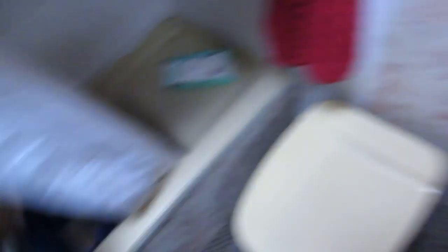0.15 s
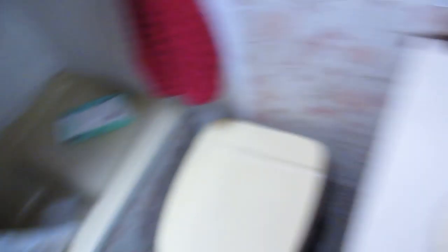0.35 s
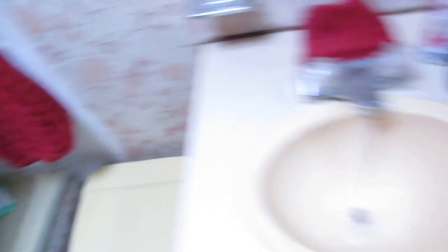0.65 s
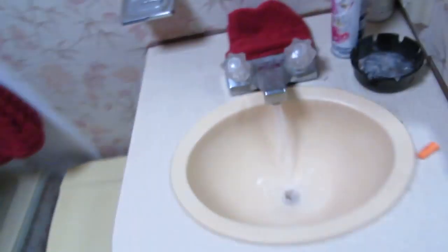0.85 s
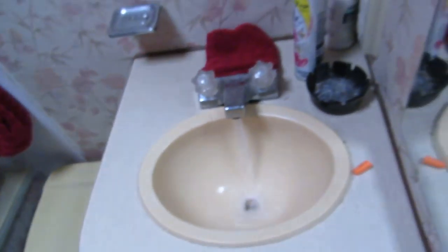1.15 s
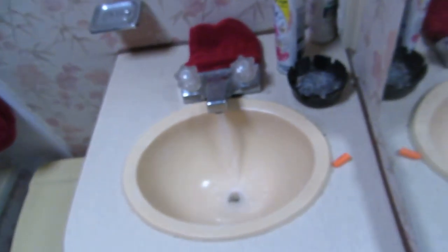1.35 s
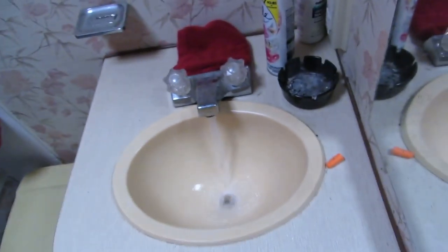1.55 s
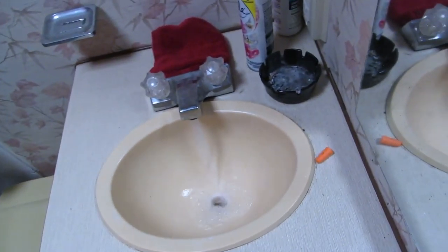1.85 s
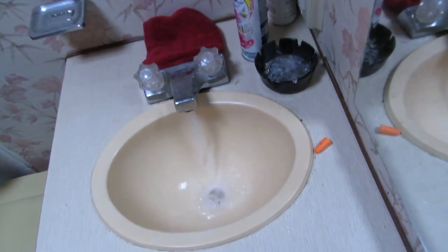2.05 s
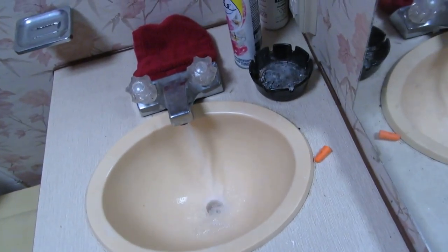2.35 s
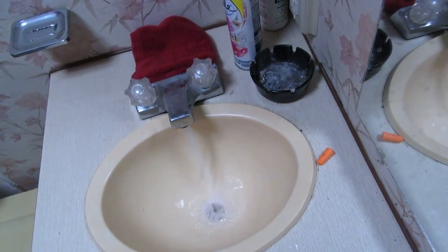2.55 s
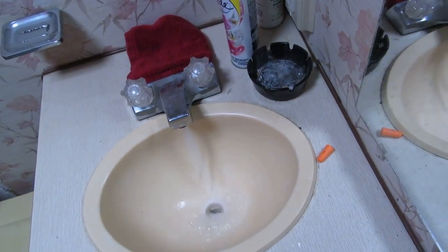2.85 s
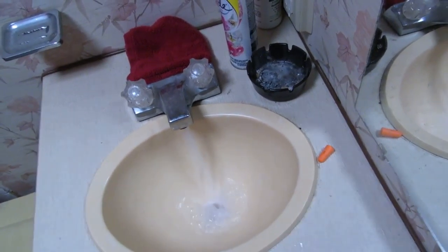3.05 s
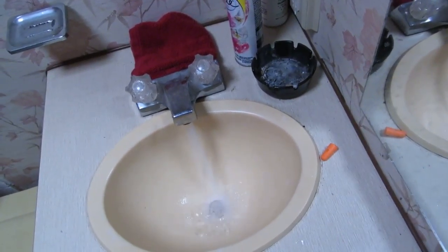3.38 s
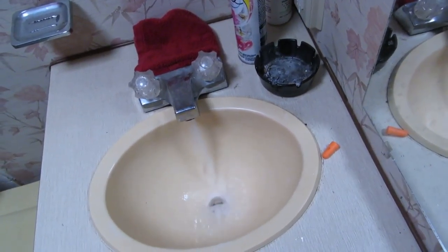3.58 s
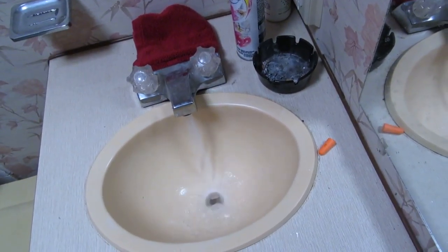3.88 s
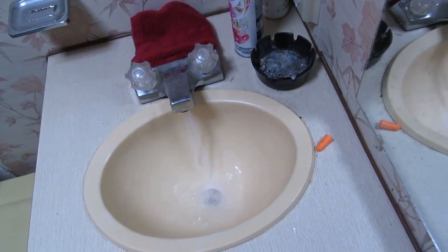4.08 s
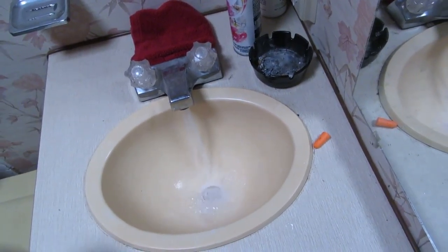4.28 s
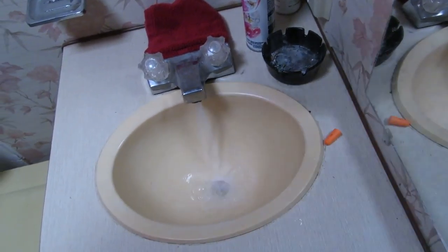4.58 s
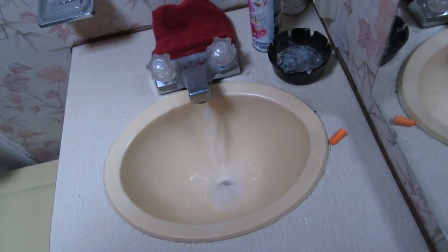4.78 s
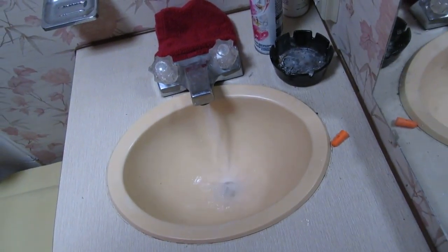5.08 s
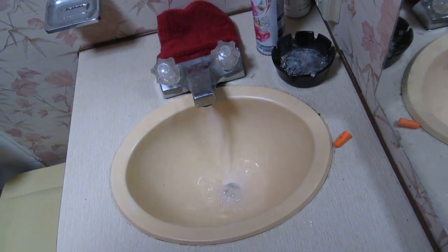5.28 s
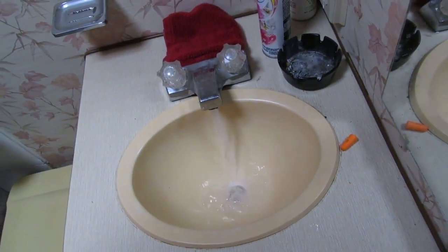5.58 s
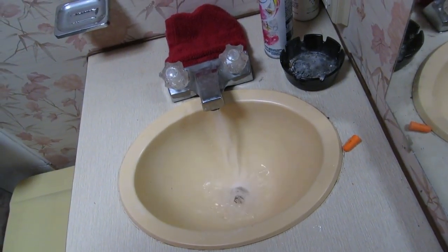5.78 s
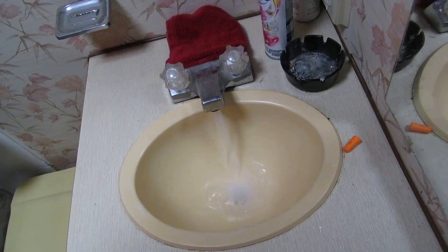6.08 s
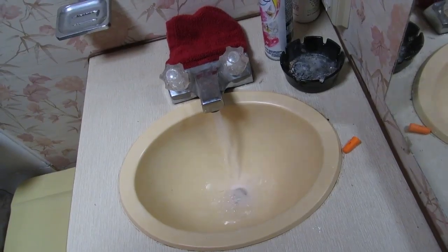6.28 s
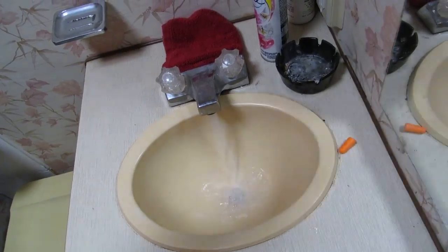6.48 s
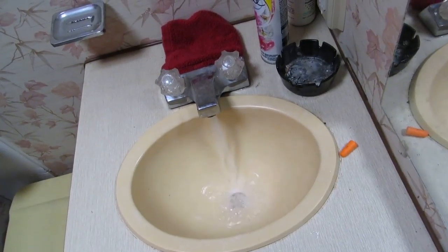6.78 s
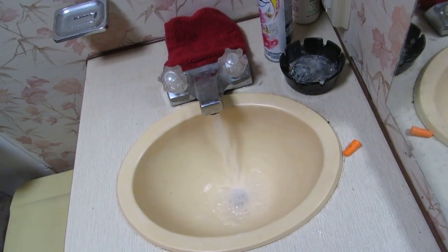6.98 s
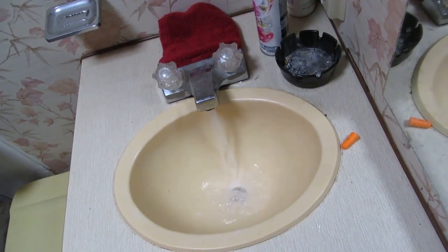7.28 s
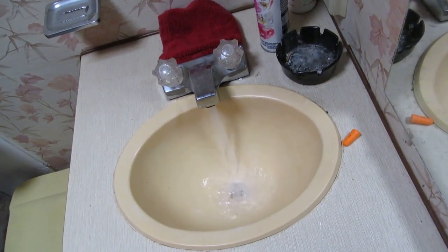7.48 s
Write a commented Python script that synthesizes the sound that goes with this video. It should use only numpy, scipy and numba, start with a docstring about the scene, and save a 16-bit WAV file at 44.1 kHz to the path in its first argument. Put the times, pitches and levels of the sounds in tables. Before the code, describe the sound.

A bathroom tap runs into a basin, hissing and spitting as trapped air bursts out, with gurgles from the drain.

```python
"""A tap running full into a moulded basin in a tiled bathroom, close to a hand-held camera's microphone.
The jet sprays and crackles, drives the basin's resonances and gurgles in the drain over a low rush of
plumbing; air pockets burst from the spout as dull thumps that break the stream. The camera rumbles as it
swings toward the bowl, and its two microphone ports hear the bass in roughly opposite phase."""
import sys
import numpy as np
from scipy import signal
from scipy.fft import rfft, irfft, next_fast_len
from scipy.io import wavfile
from scipy.ndimage import uniform_filter1d, map_coordinates
from numba import njit

SR = 44100
rng = np.random.default_rng(int(sys.argv[2]) if len(sys.argv) > 2 else 0)


def transcribe(signal):
    """Save signal, clipped to [-1, 1], as a 16-bit WAV file at the path in sys.argv[1]."""
    frames = np.atleast_2d(signal).T
    limited = np.clip(frames, -1, 1)
    pcm = np.round(limited * 32767).astype(np.int16)
    wavfile.write(sys.argv[1], SR, pcm)


N = 336924
T = np.arange(N) / SR
FFT_SIZE = next_fast_len(N + SR)
HZ = np.maximum(np.arange(FFT_SIZE // 2 + 1) * SR / FFT_SIZE, 1)


def undb(db):
    """Decibels to amplitude."""
    return 10 ** (np.asarray(db) / 20)


def unit(x):
    """Scale to rms 1."""
    return x / np.sqrt(np.mean(x ** 2))


def over_hz(table):
    """Read (pitch_hz, value) rows on a log-frequency axis."""
    hz, value = np.transpose(table)
    return np.interp(np.log(HZ), np.log(hz), value)


def filtered(x, response):
    """Apply a frequency response."""
    return irfft(rfft(x, FFT_SIZE) * response, FFT_SIZE)[:N]


def resonance(hz, width_hz):
    """Response of one resonator, 1 at its peak."""
    return 1 / (1 + 1j * (HZ - hz ** 2 / HZ) / width_hz)


def resonances(modes):
    """Response of parallel resonators with alternating sign."""
    return sum((-1) ** k * undb(db) * resonance(hz, width) for k, (hz, width, db) in enumerate(modes))


def scattered(modes):
    """Steep resonances driven from many unrelated spots add in power."""
    return np.sqrt(sum(undb(2 * db) * abs(resonance(hz, width)) ** 4 for hz, width, db in modes))


def wander(rate_hz):
    """Random levels held 1 / rate_hz seconds and smoothed twice; rms 1."""
    hold = int(SR / rate_hz)
    steps = np.repeat(rng.standard_normal(N // hold + 1), hold)
    return unit(uniform_filter1d(uniform_filter1d(steps, hold), hold)[:N])


def flicks(rate_hz, fade_s):
    """Sudden random jumps that die away; mean 0, rms 1."""
    jumps = (rng.random(N) < rate_hz / SR) * rng.random(N)
    shape = signal.lfilter([1], [1, -np.exp(-1 / (fade_s * SR))], jumps)
    return unit(shape - shape.mean())


def delayed(sound, delay_ms, sway_ms=0.088):
    """Delay along a path whose length sways with the hand."""
    path_ms = delay_ms + sway_ms * wander(1.5)
    return map_coordinates(sound, [np.arange(N) - path_ms * SR / 1000], order=3, mode="mirror")


@njit
def ring(start, hz, decay_cycles, size, swell_cycles, glide):
    """Each bubble swells for some cycles and rings out, gliding up in pitch."""
    out = np.zeros(N)
    for k in range(len(start)):
        cycle = 0.
        for i in range(start[k], N):
            cycle += hz[k] / SR
            if cycle > swell_cycles + 5 * decay_cycles[k]:
                break
            if cycle < swell_cycles:
                shape = np.sin(np.pi / 2 * cycle / swell_cycles) ** 2
            else:
                shape = np.exp((swell_cycles - cycle) / decay_cycles[k])
            out[i] += size[k] * shape * np.sin(2 * np.pi * cycle * (1 + glide * cycle))
    return out


def swarm(low_hz, high_hz, decay_cycles, scatter_db, glide, count):
    """Bubbles at random times and pitches, a few louder than the rest; rms 1."""
    when, pitch, luck = rng.random((count, 3)).T
    hz = low_hz * (high_hz / low_hz) ** pitch
    size = np.sqrt(hz) * undb(scatter_db * np.minimum(-np.log(1 - luck), 4))
    return unit(ring((when * N).astype(int), hz, np.full(count, decay_cycles), size, 0.91, glide))


def timed_bubbles(rows, swell_cycles, decay_cycles, glide, late_s):
    """Ring one bubble for each (start_s, level_db, pitch_hz) row."""
    start_s, db, hz = np.transpose(rows)
    start = ((start_s + late_s) * SR).astype(int)
    return ring(start, hz, np.full(len(hz), decay_cycles), undb(db), swell_cycles, glide)


# Tone of the spray, close to the jet: pitch_hz, gain_db
SPRAY_TONE = [(2500, -6), (5200, -3.5), (6500, -2), (8000, -1.5), (10400, -3), (12000, -3), (14000, -6.5),
              (16000, -10.5)]
# Faint whistles, relative to the spray: start_s, end_s, pitch_hz, width_hz, level_db
WHISTLES = [(1.75, 2.1, 9100, 800, -14), (2.26, 2.43, 9100, 1100, -12), (2.7, 3.8, 11600, 500, -21)]


def spray():
    """The jet hisses in narrow bands that flicker together and alone; tiny bubbles fizz on top."""
    noise = rng.standard_normal(N)
    shared_db = 0.94 * wander(50) + 1.16 * flicks(55, fade_s=0.0068)
    hiss = 0
    for hz in 2000 * 2 ** np.arange(0, 3.4, 1 / 6):
        band = np.cos(np.clip(6 * np.log2(HZ / hz), -1, 1) * np.pi / 2) ** 2
        hiss += filtered(noise, band) * undb(shared_db + 1.37 * wander(10))
    fizz = swarm(6190, 19300, decay_cycles=3.7, scatter_db=3.6, glide=0.011, count=7000)
    sound = unit(filtered(unit(hiss) + undb(-7) * fizz, undb(over_hz(SPRAY_TONE))))
    for start, end, hz, width, db in WHISTLES:
        swell = np.interp(T, [start, start + .05, end - .05, end], [0, 1, 1, 0]) * undb(3 * wander(25))
        sound += undb(db) * swell * unit(filtered(noise, resonance(hz, width) ** 2))
    return sound


# Reflections off bowl, counter, mirror and wall: delay_ms, level_db
ECHOES = [(.6, -17), (1.3, -16), (2.9, -16), (4.7, -16)]


def echoed(sound):
    """Hard surfaces near the microphone repeat the sound and comb it."""
    echoes = sum(undb(db) * delayed(sound, ms) for ms, db in ECHOES)
    return (sound + echoes) / np.sqrt(1 + sum(undb(2 * db) for _, db in ECHOES))


# Modes of the basin, microphone facing it: pitch_hz, width_hz, level_db
BASIN_MODES = [(1010, 90, -12), (1235, 80, -8), (1335, 90, -9), (1525, 100, -5), (1640, 75, 1),
               (1735, 70, -12), (1870, 125, -3.5), (2045, 65, -4), (2150, 110, -5.5), (2420, 120, -4.5)]
# The same modes, then the wash, with the microphone turned aside: level_db
ASIDE_DB = [-11.5, -6, -5, -7, -6, -0.5, -2.5, -3.5, -8, -7.5, -10]


def basin():
    """Drops patter on the bowl; each mode swells and fades on its own as the water film shifts."""
    patter = rng.standard_normal(N) * undb(1.23 * wander(25))
    patter += undb(-14.5) * swarm(1005, 3260, decay_cycles=2.4, scatter_db=1.6, glide=0.012, count=3000)
    facing = np.interp(T, [0.62, 1.4], [0, 1])  # the camera turns to the bowl
    wash = (2930, 3240, -11)  # broad splash above the modes
    sound = 0
    for k, ((hz, width, db), aside_db) in enumerate(zip(BASIN_MODES + [wash], ASIDE_DB)):
        mode = filtered(np.roll(patter, k * SR // 2), resonance(hz, width) ** 2)
        film_db = min(1, 300 / width) * 1.8 * wander(9)
        sound += mode * undb(aside_db + facing * (db - aside_db) + film_db)
    return unit(sound)


# Modes of the drain's throat, at the bottom of the bowl: pitch_hz, width_hz, level_db
DRAIN_MODES = [(317, 108, 1.5), (444, 84, 1.5), (570, 84, 7.5), (694, 290, 3), (800, 91, 3)]


def drain():
    """Churning water sounds the drain's throat, which bubbles more as it floods."""
    churn = rng.standard_normal(N) * undb(1.9 * wander(22))
    throat = unit(filtered(churn, scattered(DRAIN_MODES)))
    bubbles = swarm(440.4, 570.6, decay_cycles=6.5, scatter_db=1.6, glide=0.0018, count=1100)
    flood_db = np.interp(T, [5.1, 6.5], [-7.5, -1])
    return unit(throat + undb(flood_db) * bubbles)


# Steady flow between air pockets, at the microphone: time_s, spray_db, bowl_db, drain_db
FLOW = [(0, -32.5, -29, -37), (.6, -23, -25, -38), (1.15, -24.5, -25.5, -36.5), (1.599, -26, -28.5, -36),
        (2.2, -27, -32, -37), (2.6, -22.5, -29.5, -45.5), (2.85, -25, -32.5, -39.5), (3.4, -28, -33, -40.5),
        (4, -24.5, -33.5, -44), (4.25, -28.5, -32, -39), (4.55, -18.5, -31.5, -38.5),
        (5.1, -29, -32, -42.5), (5.7, -27, -31, -36.5), (6.2, -24.5, -29.5, -40.5), (6.5, -27, -30, -35),
        (6.75, -27.5, -30.5, -38.5), (7, -27.5, -28.5, -35.5), (7.64, -26, -29, -35.5)]


def stream(bowl_share=0.097):
    """Spray, bowl and drain follow the flow; each air pocket puffs and sends a surge behind it."""
    time_s, *flow_db = np.transpose(FLOW)
    spray_db, bowl_db, drain_db = (np.interp(T, time_s, db) for db in flow_db)
    puff_db, surge_db, swell_db = np.transpose(AIR_POCKETS)[5:]
    kick_db = pocket_humps(puff_db, from_s=-0.0083, to_s=0.04)
    kick_db += pocket_humps(surge_db, from_s=0.047, to_s=0.25)
    spray_db += kick_db
    bowl_db += bowl_share * kick_db
    drain_db += pocket_humps(swell_db, from_s=0.034, to_s=0.22)
    return echoed(undb(spray_db) * spray()) + undb(bowl_db) * basin() + undb(drain_db) * drain()


# Tone of the bathroom's plumbing: pitch_hz, gain_db
PIPE_TONE = [(30, -28), (60, -30), (120, -13), (180, -1), (240, -4.5), (310, 2), (380, -26), (520, -19),
             (900, -60)]
# Slight rise of its rush near the end: time_s, gain_db
PIPE_SWELL = [(5.9, -2.5), (6.6, -1.5)]


def plumbing():
    """The pipes rush low and unevenly all along."""
    flow = rng.standard_normal(N) * undb(5.9 * wander(6.8))
    rush = unit(filtered(flow, undb(over_hz(PIPE_TONE))))
    return undb(-50.5 + np.interp(T, *np.transpose(PIPE_SWELL))) * rush


# Handling noise, right at the microphone: time_s, level_db
HANDLING = [(0.0, -58), (0.28, -53), (0.32, -43), (0.45, -57), (0.84, -64), (0.87, -47), (1.3, -59)]


def handling():
    """The hand shakes the camera's body while it swings."""
    shake = unit(filtered(rng.standard_normal(N), resonances([(30, 27, 3), (92, 57, 9)])))
    return undb(np.interp(T, *np.transpose(HANDLING), right=-75)) * shake


# Loudest pops of the spray, close by: start_s, level_db, pitch_hz
POPS = [(.3534, -8, 10400), (.5851, -0.5, 7500), (.606, 2, 8600), (.6275, 3, 8740), (.8669, -4, 8730),
        (.9178, -6, 8550), (1.1303, 0, 11300), (1.5584, -0.5, 7100), (2.2912, -1, 9400),
        (6.1664, -2.5, 6600), (6.4742, -5.5, 8060)]


def pops():
    """Tiny bubbles ring for a few cycles, heard as sharp cracks."""
    return timed_bubbles(POPS, swell_cycles=0.94, decay_cycles=1.8, glide=0.0046, late_s=0.0012)


# Air pockets leaving the spout above the bowl:
# start_s, thump_db, t60_s, splutter_db, glug_db, spray_puff_db, spray_surge_db, drain_swell_db
AIR_POCKETS = [(1.292, -27.5, 0.27, -23.5, -31, 4.5, 3, -0.5), (1.48, -36, 0.18, -28, -30, 2, 1, -2),
               (1.673, -28.5, 0.24, -29, -46, 4.5, 3.5, -0.5), (1.845, -34, 0.43, -28, -22, 2, 4.5, -1),
               (2.03, -31, 0.17, -24, -43, 3.5, 3, 0), (2.224, -20, 0.095, -13, -23.5, 4, 2, 2),
               (2.48, -34, 0.18, -36, -50, -1, -6, 10.5), (2.616, -30, 0.11, -27, -51, 6, -3, 7.5),
               (2.669, -27, 0.16, -16.5, -42, 3, 4.5, -5), (2.748, -33, 0.18, -24, -36, 4.5, -1.5, 1),
               (2.821, -31, 0.27, -21, -37, -1, 4, -1), (2.983, -31.5, 0.24, -23.5, -54, 0.5, 0.5, 1),
               (3.05, -37, 0.19, -26.5, -45, 0.5, 0.5, -1.5), (3.096, -26, 0.2, -21, -25, 6, 4, -5.5),
               (3.338, -37, 0.4, -27.5, -50, 2.5, 2.5, 3.5), (3.444, -25, 0.13, -17, -38, 2, 2, -1.5),
               (3.592, -32.5, 0.18, -30, -37, 1, 1, 1), (3.786, -23, 0.13, -20, -27, 4.5, -1, 2.5),
               (4.002, -37, 0.44, -27, -44, -5.5, 1.5, 5.5),
               (4.291, -34, 0.41, -27.5, -36, 0.5, -1.5, -1.5),
               (4.395, -30, 0.12, -27, -28, 2.5, -5.5, -5.5),
               (4.529, -28.5, 0.22, -26.5, -37.0, 3.5, -3, 1),
               (4.665, -28, 0.17, -21.5, -33, 2.5, -1.5, 0.5), (4.83, -29, 0.21, -23, -49.0, 5, 2.5, 5.5),
               (4.955, -31.5, 0.12, -20.5, -24.5, 4.5, 5, 0.5),
               (5.151, -30, 0.092, -19.5, -40, 4.5, 3.5, 2), (5.24, -29.5, 0.21, -23.5, -54, 5, 3.5, 3.5),
               (5.504, -31, 0.097, -23, -32, 2.5, 0.5, -1.5), (5.779, -31.5, 0.21, -21, -30, 4, 2.5, -2.5),
               (6.021, -30.5, 0.27, -26.5, -40, -1.5, -2.5, 2.5), (6.14, -33, 0.17, -25, -35, 4, -0.5, 6)]
# Low modes of the basin under the spout: pitch_hz, width_hz, level_db
THUMP_MODES = [(77, 23, -9.5), (133, 26, -8), (192.4, 30, -3.5), (307, 51, -4), (475, 68, -6.5)]


def air_pockets(attack_s=0.011, fall_s=0.013):
    """Each pocket thumps the basin's low modes, glugs and drops a splutter onto the bowl."""
    churn, splutter = np.zeros((2, N))
    age = T[:SR // 2]
    attack = np.minimum(age / attack_s, 1)
    for start_s, thump_db, t60_s, splutter_db, *_ in AIR_POCKETS:
        fade = undb(-60 * age / t60_s)
        churn[int(start_s * SR):][:len(age)] += undb(thump_db) * attack * fade
        splutter[int((start_s + fall_s) * SR):][:len(age)] += undb(splutter_db) * attack * fade ** 1.1
    noise, body = rng.standard_normal(N), resonances(THUMP_MODES)
    drive = churn * noise * undb(2.25 * wander(60))
    thump = undb(-1) * filtered(drive, body) / np.std(filtered(noise, body))
    splash = unit(filtered(noise, scattered(BASIN_MODES + [(3070, 4200, -10.5)])))
    return thump + glugs() + splash * splutter * undb(1.8 * wander(150))


def glugs(pitch_hz=286.6, t60_share=0.39):
    """Each pocket rings as one big bubble that dies sooner than its thump."""
    start_s, t60_s, glug_db = np.transpose(AIR_POCKETS)[[0, 2, 4]]
    cycles = t60_share * t60_s * pitch_hz / np.log(1000)
    rows = [(s, db, pitch_hz) for s, db in zip(start_s, glug_db)]
    return timed_bubbles(rows, swell_cycles=2.5, decay_cycles=cycles, glide=0.0051, late_s=-0.0032)


def pocket_humps(height_db, from_s, to_s):
    """A smooth swell or dip in dB in a window timed from each air pocket, summed."""
    coarse_s = T[::64]
    age = coarse_s[:, None] - np.transpose(AIR_POCKETS)[0]
    progress = np.clip((age - from_s) / (to_s - from_s), 0, 1)
    humps = np.sin(np.pi * progress ** 0.85) ** 2  # comes faster than it goes
    return np.interp(T, coarse_s, (humps * height_db).sum(axis=1))


# Gulps down in the drain: start_s, level_db, pitch_hz
GULPS = [(1.677, -23.5, 604), (1.692, -24, 550), (2.098, -28, 540), (2.194, -20.5, 468), (2.231, -23, 444),
         (2.527, -22.5, 464), (3.009, -21.5, 515), (3.372, -24.5, 653), (3.467, -23, 416),
         (3.748, -25.5, 485), (4.143, -27, 502), (4.183, -23, 436), (4.334, -22.5, 528),
         (4.418, -26.5, 560), (4.548, -26.5, 520), (4.669, -23.5, 520), (4.973, -21, 482),
         (5.169, -20.5, 488), (5.271, -28, 284), (5.618, -21, 555), (5.69, -24, 457), (5.742, -26, 470),
         (5.946, -23.5, 515), (6.053, -22, 585), (6.244, -21, 516), (6.272, -24, 543), (6.286, -20, 500),
         (6.336, -21.5, 497), (6.417, -24, 475), (6.5, -24, 490), (6.523, -23.5, 417), (6.816, -24, 540),
         (6.897, -22.5, 556), (6.926, -22.5, 515), (7.207, -21.5, 480), (7.332, -21.5, 570),
         (7.491, -29, 430)]


def gulps():
    """Large single bubbles ring in the drain."""
    return timed_bubbles(GULPS, swell_cycles=3.2, decay_cycles=4.0, glide=0.0026, late_s=-0.002)


# Left microphone port relative to the right: pitch_hz, gain_db
LEFT_GAIN = [(30, -4), (200, -9), (1290, -8), (8120, -8.5), (15000, -11.0)]
# Phase lead of the left port: pitch_hz, lead_rad
LEFT_LEAD = [(60, 4.5), (260, 2.6), (600, 2.3), (1210, 1.68), (3620, 0.8), (7750, 0.14), (16000, 0.61)]
# How alike the two ports sound: pitch_hz, coherence_ratio
COHERENCE = [(60, .88), (300, .96), (1000, .92), (2500, .78), (6000, .68), (13000, .5)]


def microphone_ports(sound, room_t60_s=0.39):
    """The left port is weaker, leads in phase and picks up the tiled room's tail."""
    tail = rng.standard_normal(SR) * undb(-60 * np.arange(SR) / SR / room_t60_s)
    room = rfft(tail / np.sqrt(np.sum(tail ** 2)), FFT_SIZE)
    gain, coherence = undb(over_hz(LEFT_GAIN)), over_hz(COHERENCE)
    direct = gain * coherence * np.exp(1j * over_hz(LEFT_LEAD))
    diffuse = gain * np.sqrt(1 - coherence ** 2)
    mid = np.sqrt(abs(1 + direct) ** 2 + diffuse ** 2) / 2  # dividing by it keeps the mono level
    reverb = delayed(filtered(sound, diffuse * room / mid), delay_ms=3.0)
    return np.array([filtered(sound, direct / mid) + reverb, filtered(sound, 1 / mid)])


def scene():
    """Water, pipes and handling, heard in stereo from beside the basin."""
    return microphone_ports(stream() + air_pockets() + gulps() + pops() + plumbing() + handling())


def record(dry, limit_db=0.2, attack_s=0.0004, release_s=0.18):
    """A limiter ducks both channels on loud cracks; peaks are rounded, deep bass and top treble cut."""
    dry = signal.sosfilt(signal.butter(2, 18, "high", fs=SR, output="sos"), dry)
    peak_db = 20 * np.log10(abs(dry).max(axis=0) + 1e-9)
    over_db = np.maximum(peak_db - limit_db, 1e-6)
    # each overshoot is held and let go exponentially
    duck_db = np.exp(np.maximum.accumulate(np.log(over_db) + T / release_s) - T / release_s)
    ducked = dry * undb(-uniform_filter1d(duck_db, int(attack_s * SR)))
    rounded = ducked / (1 + (ducked / 1.05) ** 6) ** (1 / 6)
    return signal.sosfilt(signal.ellip(14, .3, 80, 15735, fs=SR, output="sos"), rounded)


dry = scene()
out = record(dry)
transcribe(out)
```